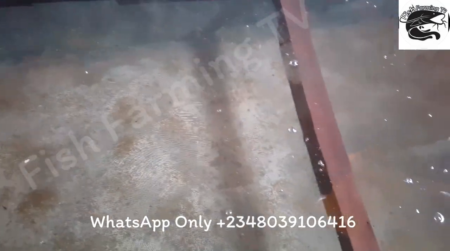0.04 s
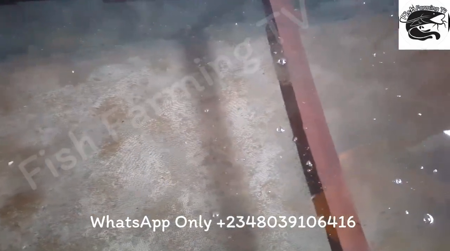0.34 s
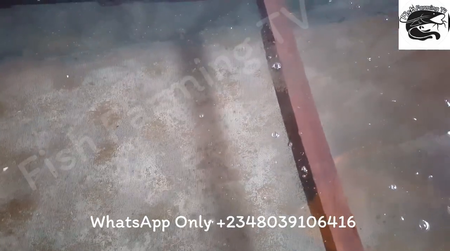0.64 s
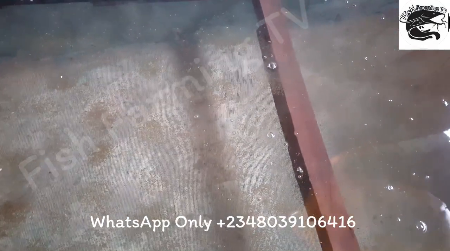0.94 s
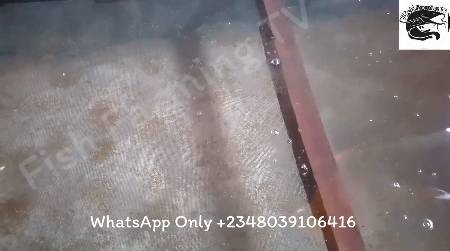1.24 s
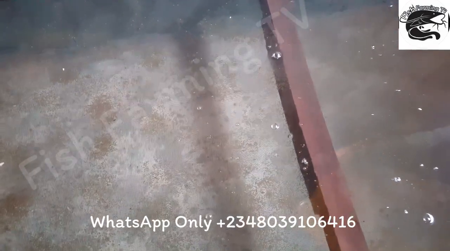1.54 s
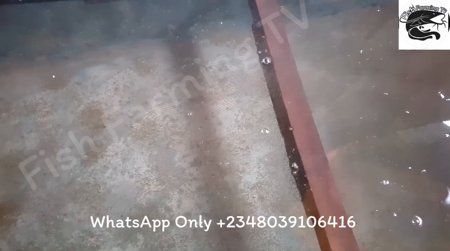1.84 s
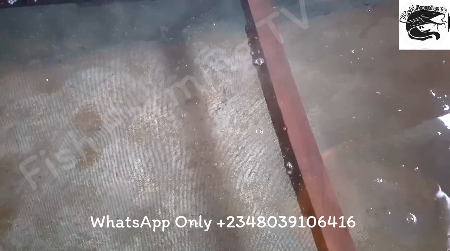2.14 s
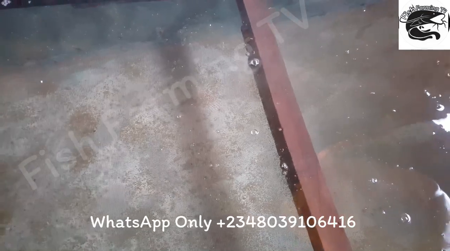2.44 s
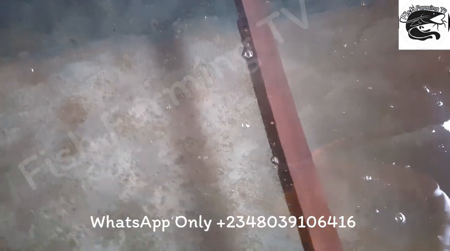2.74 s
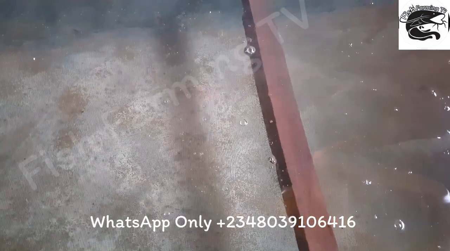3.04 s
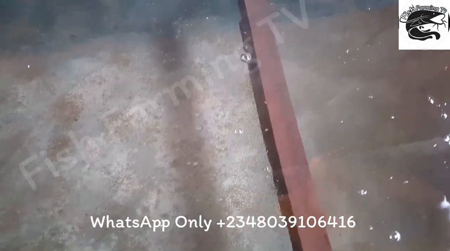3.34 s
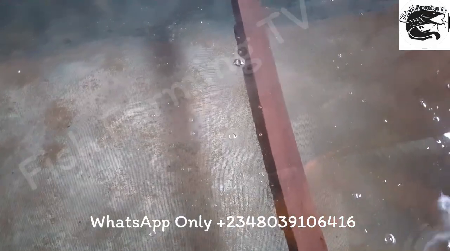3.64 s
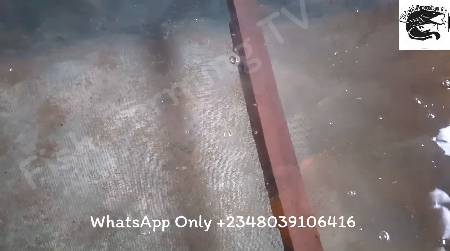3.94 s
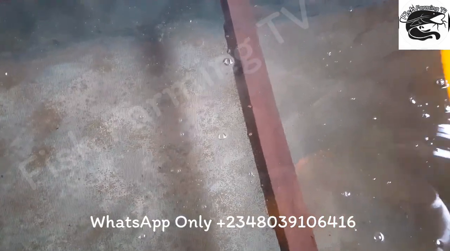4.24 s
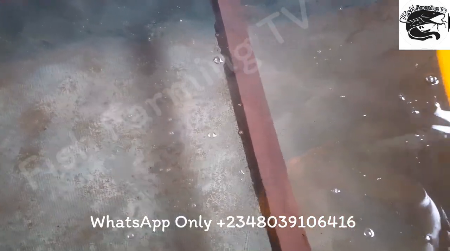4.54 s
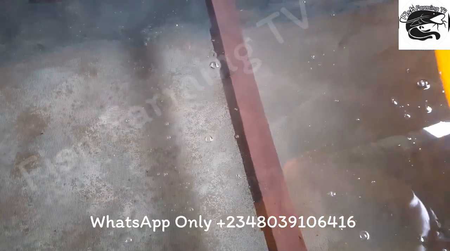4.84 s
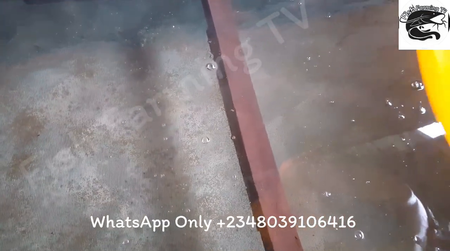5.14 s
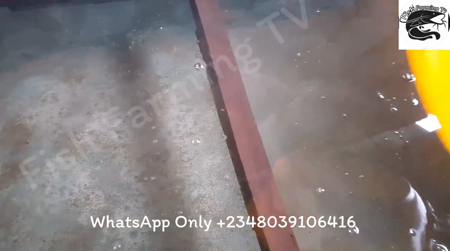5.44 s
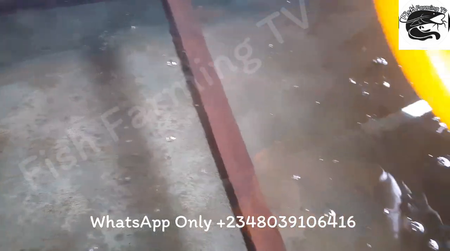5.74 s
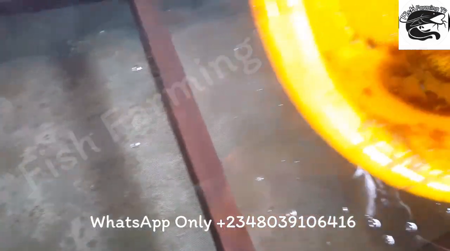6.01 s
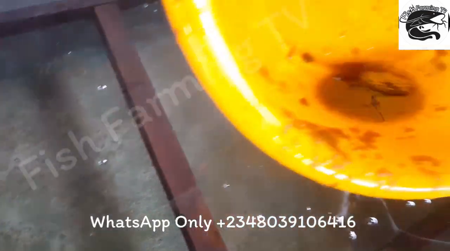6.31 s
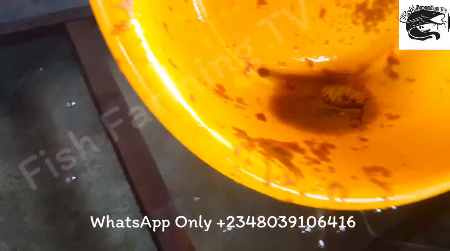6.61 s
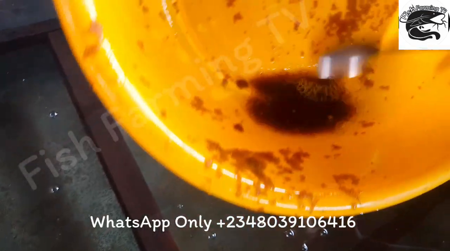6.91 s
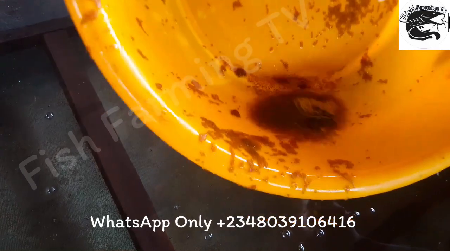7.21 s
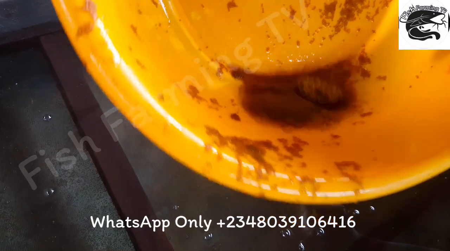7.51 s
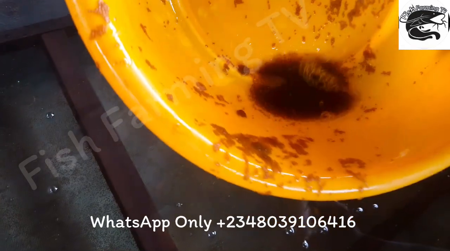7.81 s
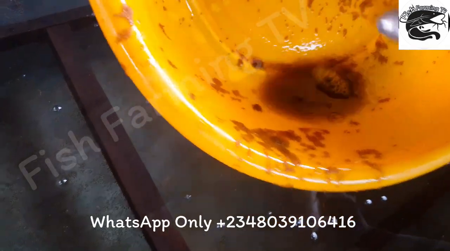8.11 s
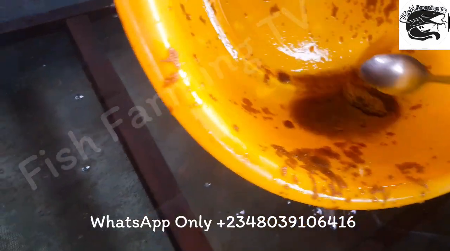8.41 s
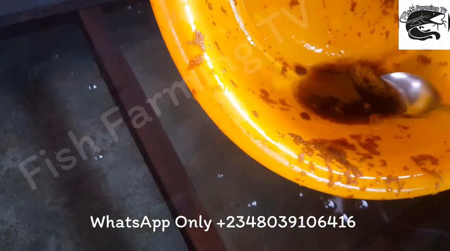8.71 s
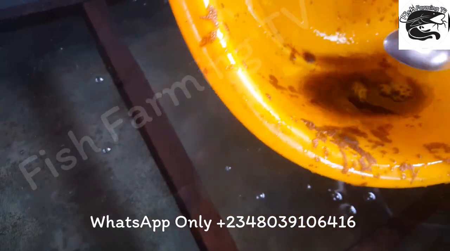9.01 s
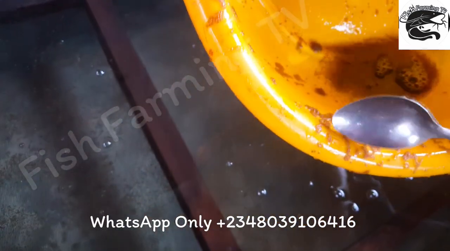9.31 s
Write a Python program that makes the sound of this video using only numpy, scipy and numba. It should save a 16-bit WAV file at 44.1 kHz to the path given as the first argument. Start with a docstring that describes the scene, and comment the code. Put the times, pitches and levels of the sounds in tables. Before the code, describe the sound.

A metal spoon scrapes wet feed out of a plastic bowl, close to the microphone and slightly to the left. Light taps and short rasps start sparsely, then grow louder and more regular, with clicks as the edge catches. Midway the spoon thumps the side and the bowl flexes. The last strokes are duller and squeak briefly before a final tap. A water tank adds a short echo, with a very faint bird and insects outdoors.

```python
"""Outdoors, close on a plastic bowl held over a water tank: a metal spoon scrapes out wet feed.
The spoon lands with a tap and drags in a stick-slip rasp; two drops fall and an insect chirrs.
Stroke follows stroke, the edge catching, a far bird whistling now and then. Near 3 s and from 5.4 to
5.9 s the spoon thumps the side and the whole bowl flexes. The late strokes squeak; one tap ends it.
Throughout, the bowl sits left of centre, with a short echo off the tank walls over quiet air."""
import sys
import numpy as np
from scipy import signal
from scipy.fft import rfft, irfft, next_fast_len
from scipy.io import wavfile
from scipy.ndimage import uniform_filter1d
from numba import njit

SR = 44100
rng = np.random.default_rng(int(sys.argv[2]) if len(sys.argv) > 2 else 0)


def wav_out(sig):
    """Save sig, one row per channel (or a flat mono array), as 16-bit PCM at SR to the path in sys.argv[1]."""
    wavfile.write(sys.argv[1], SR, np.round(np.clip(np.atleast_2d(sig).T, -1, 1) * 32767).astype(np.int16))


N = 412776
TIME = np.arange(N) / SR

# spectrum of the bowl under a dragging or catching edge: f/Hz, level/dB
SCRAPE_SPECTRUM = [(59, -61), (100, -16), (197, -21), (350, -9.5), (452, -9.5), (891, -4.5), (1060, -0.5),
                   (1580, -4), (2040, -1.5), (3400, -8.5), (8280, -10.5), (10200, -26), (12400, -17.5),
                   (16000, -28.5)]


def undb(db):
    """Decibels to amplitude."""
    return 10 ** (np.asarray(db) / 20)


def rms(x):
    """Root mean square, never zero."""
    return np.sqrt(np.mean(x ** 2)) + 1e-12


def decay(t, t60_s):
    """Exponential fade, 60 dB down at t60_s."""
    return np.exp(-np.log(1000) * t / t60_s)


def walk(rate):
    """Random drift with a spread near 1 and `rate` turning points a second."""
    knots = rng.standard_normal(int(N / SR * rate) + 2)
    return np.interp(TIME * rate, np.arange(len(knots)), knots)


def on_log_axis(hz, points):
    """Read (Hz, value) points at any frequency."""
    at, value = np.transpose(points)
    return np.interp(np.log(hz + 1), np.log(at), value)


def shape(x, response):
    """Filter by a function of frequency."""
    size = 2 * next_fast_len(x.shape[-1])
    hz = np.fft.rfftfreq(size, 1 / SR) + 1e-6
    return irfft(rfft(x, size) * response(hz), size)[..., :x.shape[-1]]


def colour(x, points):
    """Causal filter with the given (Hz, dB) outline, made from its cepstrum."""
    def response(hz):
        cepstrum = irfft(np.log(undb(on_log_axis(hz, points))))
        cepstrum[1:len(hz) - 1] *= 2
        cepstrum[len(hz):] = 0
        return np.exp(rfft(cepstrum))
    return shape(x, response)


def registers(x):
    """Split into thud, knock and tick ranges."""
    edges = [(700, "low"), ([700, 4500], "band"), (4500, "high")]
    return [signal.sosfilt(signal.butter(3, hz, kind, fs=SR, output="sos"), x) for hz, kind in edges]


@njit
def resonance(x, hz, width):
    """State-variable band-pass whose centre can move; gain 1 at the centre."""
    y, band, low = np.empty(len(x)), 0., 0.
    for i in range(len(x)):
        g, k = np.tan(np.pi * hz[i] / SR), width / hz[i]
        v = (band + g * (x[i] - low)) / (1 + g * (g + k))
        band, low, y[i] = 2 * v - band, low + 2 * g * v, k * v
    return y


def outdoor_air(level_db=-66.5, swell_db=.8, wide_hz=700):
    """Faint rumble and hiss all round, alike on both channels in the bass."""
    # spectrum of the air: f/Hz, level/dB
    spectrum = [(15, -49), (53, -8), (165, -8), (354, -18.5), (2500, -29), (5730, -36), (7710, -32.5),
                (9840, -41), (16000, -39)]
    mid, side = (colour(rng.standard_normal(N), spectrum) for _ in range(2))
    side = shape(side, lambda hz: hz / (hz + wide_hz))
    return np.array([mid + side, mid - side]) / rms(mid) * undb(level_db + swell_db * walk(19))


def insects(chirr_db=-75, whine_db=-87, start_s=.55, end_s=2.5, pulse_hz=2.3):
    """Faint and centred: one pulsing bout of an insect's chirring, and a thin steady whine."""
    def narrow_noise(hz, width_hz):
        centre = np.full(N, hz)
        x = resonance(resonance(rng.standard_normal(N), centre, width_hz), centre, width_hz)
        return x / rms(x)
    whine = undb(whine_db) * narrow_noise(hz=6600., width_hz=500.)
    bout = uniform_filter1d(1. * (TIME > start_s) * (TIME < end_s), SR // 10)
    pulse = np.sin(np.pi * pulse_hz * (TIME - start_s)) ** 4
    return whine + undb(chirr_db) * bout * pulse * narrow_noise(hz=7700., width_hz=1100.)


def bird(level_db=-66, arch_hz=260, waver=.012, echo_t60_s=.45):
    """Far off the microphone, whistles arch up and down in pitch and blur in their own echo."""
    # whistles: middle t/s, length/s, top f/Hz
    whistles = [(2.766, 0.14, 2210), (6.185, 0.045, 2310), (7.733, 0.14, 2240), (7.989, 0.08, 2120)]
    song, unsteady = 0, 1 + waver * walk(120)
    for s, length, hz in whistles:
        along = np.clip(2 * (TIME - s) / length, -1, 1)
        pitch = (hz - arch_hz * along ** 2) * unsteady
        song = song + np.cos(np.pi / 2 * along) * np.sin(2 * np.pi * np.cumsum(pitch) / SR)
    tail = rng.standard_normal((2, SR // 2)) * decay(TIME[:SR // 2], echo_t60_s)
    echo = signal.fftconvolve(song[None], tail / np.linalg.norm(tail), axes=1)[:, :N]
    return undb(level_db) * (song + echo)


def tank_echo(x, build_s=.0011):
    """The tank walls throw back a diffuse tail that lasts longest in the bass."""
    # bands of the echo: f/Hz, t60/s, level/dB
    bands = [(100, 0.9, -23), (400, 0.22, -10.5), (1500, 0.2, -12), (4000, 0.13, -10), (14000, 0.059, -5.5)]
    t = TIME[:SR // 2]
    noise = rng.standard_normal((2, len(t)))
    centres, tail = [row[0] for row in bands], 0
    for (_, t60, db), weights in zip(bands, np.eye(len(bands))):
        fade = decay(t, t60) * (1 - np.exp(-t / build_s))
        band = shape(noise, lambda hz: on_log_axis(hz, list(zip(centres, weights))))
        tail = tail + undb(db) * band * fade / np.linalg.norm(fade)
    return signal.fftconvolve(x, tail, axes=1)[:, :N]


def over_tank(x, bass_hz=140, dryness=.83, lag_s=.00028, max_phase_rad=1.5):
    """The bowl, held over the tank, reaches the microphone's left port louder but a little later."""
    # where the bowl is held: t/s, left minus right/dB, bass level/dB
    positions = [(0, 5, -10), (2.2, 2, -1.5), (3.049, 3.5, -18.5), (3.7, 2, -2), (5.452, 2.5, 1),
                 (5.9, 5.5, -4.5), (6.701, 7, 6.5), (7.85, 9, 2.5), (8.299, 6, -1), (9.3, 6.5, -15)]
    # the bowl beams its middle range to the left: f/Hz, extra left minus right/dB
    beam = [(100, -8), (260, -7.5), (500, -2), (1000, 1), (2000, 3.5), (4000, 0), (10000, -1.5)]
    sides = np.array([[.5], [-.5]])
    s, *columns = np.transpose(positions)
    pan_db, bass_db = (np.interp(TIME, s, column) for column in columns)
    bass = shape(x, lambda hz: 1 / (1 + (hz / bass_hz) ** 4))
    x = x + (undb(bass_db) - 1) * bass

    def port_lag(hz):
        phase = max_phase_rad * np.tanh(2 * np.pi * hz * lag_s / max_phase_rad)
        return np.exp(-1j * sides * phase)
    echo = tank_echo(x * undb(-dryness * (pan_db - pan_db.mean())))  # drier nearer the left port
    heard = shape(x, port_lag) + echo
    return shape(heard, lambda hz: undb(sides * on_log_axis(hz, beam))) * undb(sides * pan_db)


def add(out, s, x, scatter_db=-2, scatter_s=.0031, scatter_hz=700):
    """Place one sound at time s; each spot scatters to the two channels in its own way."""
    t = TIME[:SR // 50]
    paths = rng.standard_normal(len(t)) * np.exp(-t / scatter_s)
    paths = signal.lfilter(*signal.butter(2, scatter_hz, "high", fs=SR), paths / np.linalg.norm(paths))
    side = undb(scatter_db) * signal.fftconvolve(x, paths)[:len(x)]
    start = int(s * SR)
    out[:, start:start + len(x)] += np.array([x + side, x - side])[:, :N - start]


def drips(t60_s=.0083, glide=3):
    """Each drop into the tank traps a tiny bubble that rings and rises in pitch."""
    # drops: t/s, starting f/Hz, level/dB
    drops = [(0.499, 3400, -49), (0.582, 5300, -42.5)]
    out, t = np.zeros((2, N)), TIME[:SR // 20]
    for s, hz, db in drops:
        add(out, s, undb(db) * np.sin(2 * np.pi * hz * t * (1 + glide * t)) * decay(t, t60_s))
    return out


def squeaks(waver=.032):
    """For a moment the slips fall into step and the edge sings on the wet plastic."""
    # squeaks: start t/s, length/s, f/Hz, level/dB
    notes = [(8.542, 0.023, 1760, -30), (8.652, 0.02, 1620, -27), (8.675, 0.021, 1630, -40)]
    out, unsteady = np.zeros((2, N)), 1 + waver * walk(400)
    for s, length, hz, db in notes:
        on = np.arange(int(s * SR), int((s + length) * SR))
        tone = np.sin(2 * np.pi * np.cumsum(hz * unsteady[on]) / SR)
        add(out, s, undb(db) * np.hanning(len(on)) * tone)
    return out


def bowl(spectrum):
    """The bowl's answer to one push: a dense, dead wall plus a few modes that ring on."""
    # modes: f/Hz, t60/s, level over the dense modes around them/dB
    modes = [(78, 0.56, 3), (215, 0.093, 2.5), (266.4, 0.087, 6.5), (467.4, 0.054, 8), (568, 0.065, 0.5)]

    def response(hz):
        return 1 + sum(undb(db) / (1 + 1j * (hz / f - f / hz) * f * t60 * np.pi / np.log(1000))
                       for f, t60, db in modes)
    return shape(colour(signal.unit_impulse(SR // 3), spectrum), response)


def blows(rows, spectrum, chatter, chatter_s, skid_db, thud_db, knock_db, tick_db, ring_db,
          reach=10, skid_s=.035, ring_t60_s=.007):
    """Each blow is a push, a brief chatter of the edge and a faint skid; the touched spot rings."""
    out, body = np.zeros((2, N)), bowl(spectrum)
    t = TIME[:len(body)]
    attack = slice(SR // 50)
    usual_knock = np.median([row[1] for row in rows])
    rattle_fade = np.exp(-t / chatter_s) + undb(skid_db) * np.exp(-t / skid_s)
    for s, knock, thud, tick, ring_hz in rows:
        rattle = rng.standard_normal(len(t)) * rattle_fade
        force = signal.unit_impulse(len(t)) + chatter * rattle / np.linalg.norm(rattle)
        low, mid, high = registers(signal.fftconvolve(force, body)[:len(t)])
        # a soft contact carries little above `reach` times the pitch of its spot
        mid = signal.lfilter(*signal.butter(2, min(reach * ring_hz, SR / 3), fs=SR), mid)
        ring = np.sin(2 * np.pi * ring_hz * t) * decay(t, ring_t60_s)
        spot = signal.fftconvolve(force, ring)[:len(t)]
        # stiffer, higher spots ring less; harder blows ring more
        spot_db = ring_db - 8.5 * np.log2(ring_hz / 1500) + .32 * (knock - usual_knock)
        parts = [(low, thud + thud_db), (mid, knock + knock_db),
                 (spot, knock + knock_db + spot_db), (high, tick + tick_db)]
        add(out, s, sum(x * undb(db) / rms(x[attack]) for x, db in parts))
    return out


def taps():
    """The spoon lands: a knock, a thud of the wall and a tick of the edge."""
    # landings: t/s, relative knock/dB, thud/dB, tick/dB, ring f/Hz
    landings = [(0.098, -13, -32, -26, 1040), (1.079, -21, -42.5, -33.5, 1930),
                (1.497, -21, -38, -30, 1310), (1.95, -17, -45.5, -29, 1890), (2.252, -10.5, -31, -22, 1475),
                (2.873, -18.5, -35, -47.5, 1250), (3.556, -17, -25.5, -38.5, 880),
                (3.661, -17.5, -30.5, -52.5, 2070), (4.066, -17.5, -27, -29, 2180),
                (4.468, -18.5, -27.5, -36.5, 2070), (4.869, -15.5, -30.5, -32.5, 1890),
                (5.296, -15, -22.5, -30, 2024), (6.21, -16, -32.5, -37.5, 843),
                (6.654, -20.5, -31, -44, 1410), (7.103, -15, -26.5, -37.5, 1400),
                (7.498, -14.5, -26, -37.5, 1295), (7.856, -18.5, -27, -40, 1348),
                (8.172, -17, -35, -46, 1327), (9.336, -8.5, -53, -30, 905)]
    # spectrum of a tap: f/Hz, level/dB
    spectrum = [(29, -32.5), (50, -15), (600, -5.5), (1300, 2), (1620, -8), (1870, 1.5), (2810, -6),
                (3410, -15), (8340, -29.5), (9870, -37.5), (13800, -30.5), (16000, -41)]
    return blows(landings, spectrum, chatter=1.2, chatter_s=.0025, skid_db=-22.5,
                 thud_db=-1.5, knock_db=-15.5, tick_db=-8, ring_db=-6.5)


def thumps():
    """The spoon runs into the side and the whole bowl flexes."""
    # hits on the side: t/s, relative knock/dB, thud/dB, tick/dB, ring f/Hz
    hits = [(3.052, -15.5, -26.5, -41, 1977), (5.448, -4.5, -12.5, -30, 1570),
            (5.643, -17.5, -30, -49.5, 483), (5.855, -11, -18, -35.5, 1475)]
    # spectrum of a thump: f/Hz, level/dB
    spectrum = [(24, -51), (40, -12.5), (133, -1), (262, 2), (372, -6), (751, -17), (1020, -17.5),
                (1550, -14.5), (2440, -20), (3500, -28), (16000, -48)]
    return blows(hits, spectrum, chatter=.82, chatter_s=.011, skid_db=-21.5,
                 thud_db=-1.5, knock_db=-12.5, tick_db=-1, ring_db=-9.5)


def catches():
    """The edge catches hard and lets go; its faint tick follows the level of the knock."""
    # releases: t/s, relative knock/dB, thud/dB, ring f/Hz
    releases = [(0.249, -28.5, -43.5, 1010), (0.323, -25, -61, 990), (1.135, -21, -45, 1900),
                (1.283, -28.5, -68, 2040), (1.596, -27.5, -61, 1320), (1.632, -20.5, -53, 1790),
                (2.331, -23, -61, 1870), (2.888, -22, -48, 1860), (3.067, -17.5, -32.5, 2040),
                (3.694, -16.5, -29, 1780), (3.733, -21, -27, 1960), (3.746, -10.5, -36, 2170),
                (3.767, -10, -50.5, 2580), (3.794, -17, -40, 1950), (3.82, -20, -25, 1490),
                (4.15, -11, -29.5, 2070), (4.22, -14.5, -27.5, 2120), (4.498, -14.5, -38, 1240),
                (4.51, -15.5, -42, 2080), (4.546, -15.5, -37.5, 1220), (4.631, -18.5, -37.5, 2000),
                (4.66, -13, -30.5, 1173), (4.981, -13, -32, 2060), (5.003, -13.5, -29.5, 1100),
                (5.022, -11, -31, 2210), (5.04, -14, -44, 2730), (5.414, -16.5, -25, 1340),
                (5.467, -14.5, -17, 1780), (5.691, -14, -42.5, 1430), (5.704, -20.5, -49.5, 2030),
                (6.323, -17, -38.5, 2130), (6.349, -14.5, -32, 1880), (6.788, -17.5, -28.5, 2040),
                (6.856, -9.5, -26.5, 2050), (7.234, -16.5, -26.5, 2210), (7.245, -13.5, -36, 2230),
                (7.577, -20, -39.5, 1320), (7.609, -26, -38.5, 2490), (7.635, -20.5, -33, 2010),
                (8.28, -22, -33, 1340), (8.35, -26.5, -56, 1740), (8.498, -20, -62, 1420),
                (8.552, -24, -45, 1710), (8.639, -19.5, -39, 1480), (8.778, -20, -63, 1360),
                (8.819, -24.5, -48, 1750)]
    rows = [(s, knock, thud, knock, hz) for s, knock, thud, hz in releases]
    return blows(rows, SCRAPE_SPECTRUM, chatter=1.7, chatter_s=.004, skid_db=-25,
                 thud_db=-5.5, knock_db=-18, tick_db=-36.5, ring_db=1, reach=1.8)


def wet_ticks(centre_hz, per_s=110, spread_db=8, t60_s=.007, below_octaves=.65):
    """Crumbs of wet feed give way under the edge, each ticking at a pitch near the touched spot's."""
    t = TIME[:SR // 100]
    out = np.zeros(len(centre_hz) + len(t))
    count = max(int(per_s * len(centre_hz) / SR), 2)
    for k, (late, size, pitch) in enumerate(rng.random((count, 3))):
        at = int((k + late) / count * len(centre_hz))
        hz = centre_hz[at] * 2 ** (pitch - below_octaves)
        out[at:at + len(t)] += undb(spread_db * size) * np.sin(2 * np.pi * hz * t) * decay(t, t60_s)
    return out[:len(centre_hz)]


def slips(per_s, scatter_db):
    """Stick-slip: releases at uneven gaps, each of its own size."""
    chance = rng.random((int(per_s * N / SR), 2))
    gaps = .25 - np.log(1 - chance[:, 0])
    at = (np.cumsum(gaps) / gaps.sum() * (N - 1)).astype(int)
    size = undb(scatter_db * np.minimum(-np.log(1 - chance[:, 1]), 4))
    return np.bincount(at, size * rng.choice([-1, 1], len(at)), N)


def friction(grit_db=-8, judder_db=4.5, snag_s=.0018, snag_db=-1, low_db=-2, smooth_db=-.5):
    """Slips, fine grit and small snags drive the bowl; returns the wall's rasp and the edge's hiss."""
    coarse, grit = slips(per_s=330, scatter_db=1.5), slips(per_s=3000, scatter_db=1)
    force = (coarse / rms(coarse) + undb(grit_db) * grit / rms(grit)) * undb(judder_db * walk(130))
    force = force / rms(force)
    # a snag lets go in a short burst of chatter
    releases = abs(slips(per_s=85, scatter_db=-2.5))
    snags = signal.lfilter([1], [1, -np.exp(-1 / (snag_s * SR))], releases) * rng.standard_normal(N)
    low, mid, high = registers(bowl(SCRAPE_SPECTRUM))
    wall_response = (undb(low_db) * low + mid) / np.linalg.norm(mid)
    wall = signal.fftconvolve(force + undb(snag_db) * snags / rms(snags), wall_response)
    # the hiss comes from all along the edge, so it differs at the two microphone ports
    edge_force = force + undb(smooth_db) * rng.standard_normal((2, N))
    return wall, signal.fftconvolve(edge_force, high[None], axes=1)


def scrape(wall_db=-6, spot_db=-8, upper_db=-10, crumbs_db=-6, hiss_db=-2,
           spot_hz=2010, upper_ratio=1.55, width_hz=650., sink=.3, bright_hz=7000, sizzle_hz=10500,
           rasp_swell_db=14.5, hiss_swell_db=24.5, ease_db=11, touch_s=.017):
    """Close up, the spoon drags along the wall; the touched spot's two resonances sink as it goes."""
    # strokes: start t/s, end t/s, relative rasp/dB, hiss of the edge/dB
    strokes = [(0.17, 0.368, -40, -58.5), (1.067, 1.24, -41, -52), (1.196, 1.309, -46.5, -42.5),
               (1.567, 1.67, -42.5, -42.5), (1.939, 2.072, -40, -39.5), (2.291, 2.385, -38, -38.5),
               (2.956, 3.094, -34, -39), (3.551, 3.656, -30, -46), (3.635, 3.847, -30, -34),
               (4.113, 4.267, -29.5, -30.5), (4.505, 4.695, -32, -34.5), (4.949, 5.091, -30, -32),
               (5.35, 5.504, -29, -34), (5.622, 5.749, -33, -50), (5.786, 5.86, -28, -44.5),
               (6.254, 6.389, -29.5, -33), (6.758, 6.888, -30, -32.5), (7.168, 7.281, -27.5, -36),
               (7.564, 7.656, -35.5, -38.5), (7.91, 7.943, -30.5, -40), (8.154, 8.243, -37, -55.5),
               (8.245, 8.335, -32.5, -49.5), (8.306, 8.399, -37.5, -62.5), (8.349, 8.499, -56, -72.5),
               (8.451, 8.565, -34, -52), (8.534, 8.723, -39, -61.5), (8.705, 8.884, -34, -61.5)]
    hardest = .56  # share of the stroke at which the hand presses most
    wall, edge = friction()
    sizzle = shape(edge, lambda hz: 1 / (1 + (sizzle_hz / hz) ** 8))
    drift, out = .2 * walk(70), np.zeros((2, N))
    for start, end, rasp, hiss in strokes:
        on = np.arange(int(start * SR), int(end * SR))
        t = TIME[on]
        travel = (t - start) / (end - start)
        slack = np.interp(travel, [0, hardest], [1, 0]) ** 2
        ease = np.interp(travel, [hardest, 1], [0, 1]) ** 2
        touch = np.clip(np.minimum(t - start, end - t) / touch_s, 0, 1) * undb(-ease_db * ease)
        bare_db = hiss - rasp  # low where wet feed cushions the edge
        centre = spot_hz * 2 ** (-.03 * bare_db) * np.exp(drift[on] - sink * (travel - hardest))
        spot, upper = (resonance(wall[on], hz, width_hz) for hz in (centre, upper_ratio * centre))
        parts = (wall[on], wall_db), (spot, spot_db), (upper, upper_db), (wet_ticks(centre), crumbs_db)
        body = sum(undb(db) * x / rms(x) for x, db in parts)
        # a cushioned edge gives a dull rasp
        corner_hz = min(bright_hz * undb(bare_db / 2), SR / 3)
        body = signal.lfilter(*signal.butter(2, corner_hz, fs=SR), body)
        add(out, start, touch * body * undb(rasp - rasp_swell_db * slack))
        # a bare edge sizzles in the top octave
        fizz = edge[:, on] + (undb(8.5 + .26 * bare_db) - 1) * sizzle[:, on]
        out[:, on] += touch * fizz / rms(edge[:, on]) * undb(hiss + hiss_db - hiss_swell_db * slack)
    return out


def scene():
    """Spoon, bowl and drips close up over the tank; air, bird and insects behind."""
    close = taps() + thumps() + catches() + scrape() + squeaks() + drips()
    return over_tank(close) + outdoor_air() + bird() + insects()


def record(dry, rumble_hz=55, top_hz=16100):
    """The small microphone loses the deepest bass and rounds the peaks; the recorder cuts the top."""
    heard = signal.sosfilt(signal.butter(2, rumble_hz, "high", fs=SR, output="sos"), dry)
    heard = heard / (1 + heard ** 4) ** .25
    return signal.sosfilt(signal.ellip(8, .2, 70, top_hz, fs=SR, output="sos"), heard)


dry = scene()
out = record(dry)
wav_out(out)
```